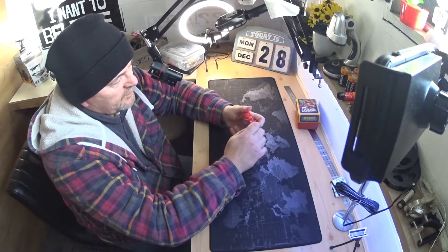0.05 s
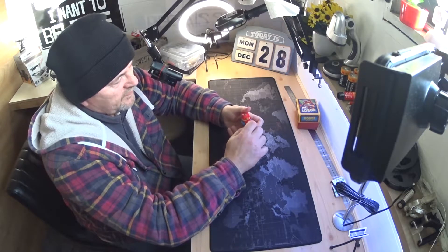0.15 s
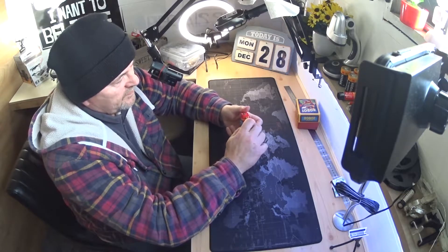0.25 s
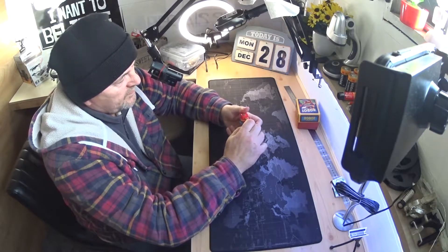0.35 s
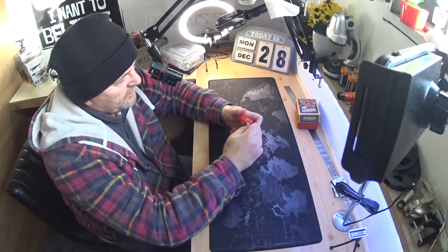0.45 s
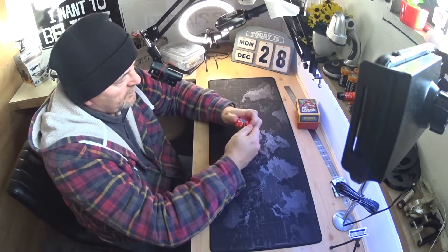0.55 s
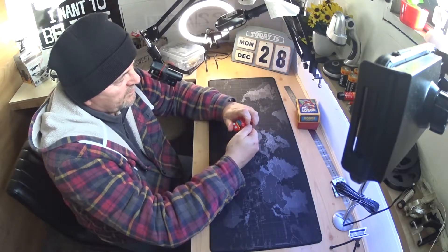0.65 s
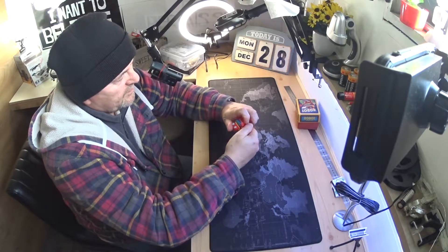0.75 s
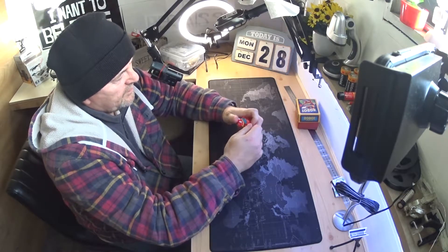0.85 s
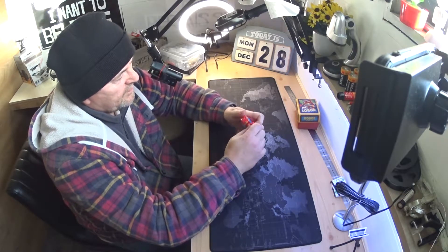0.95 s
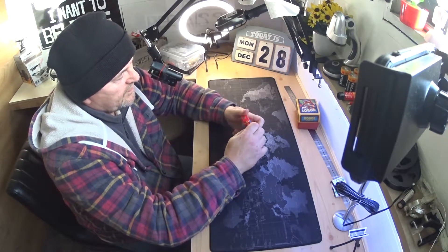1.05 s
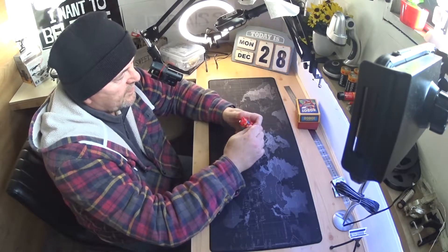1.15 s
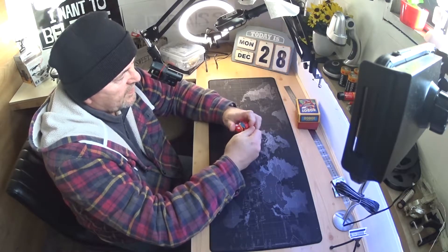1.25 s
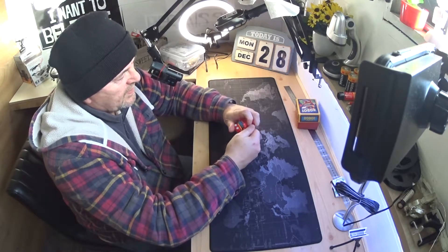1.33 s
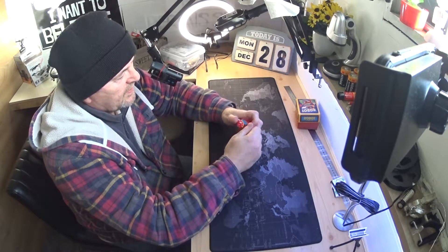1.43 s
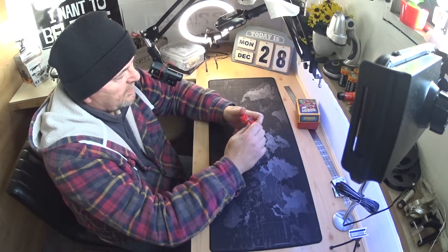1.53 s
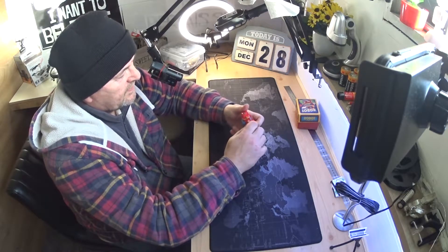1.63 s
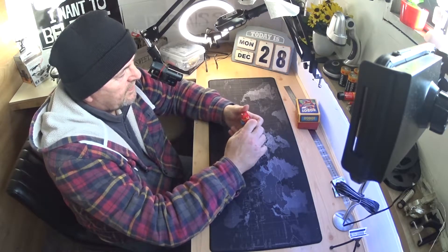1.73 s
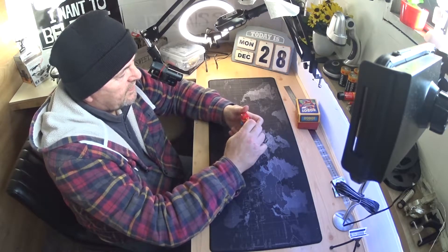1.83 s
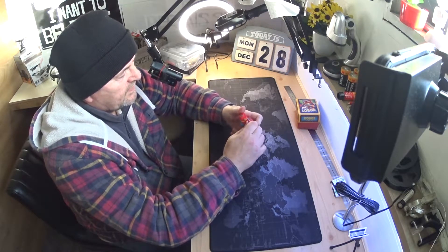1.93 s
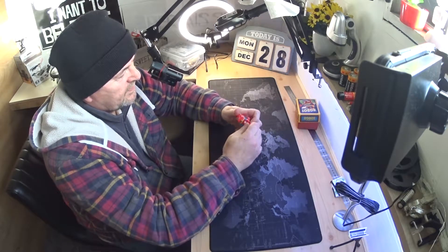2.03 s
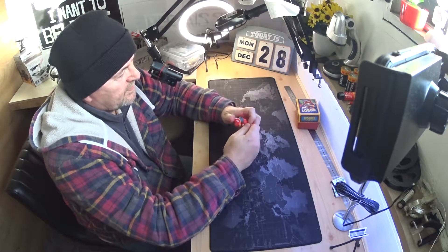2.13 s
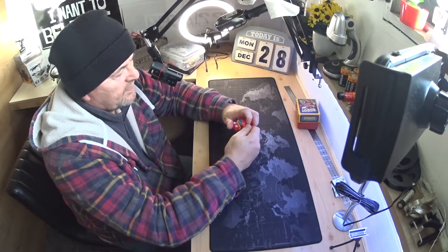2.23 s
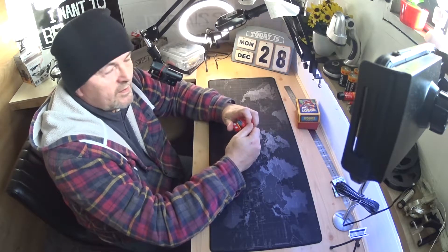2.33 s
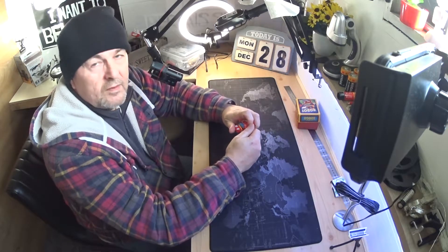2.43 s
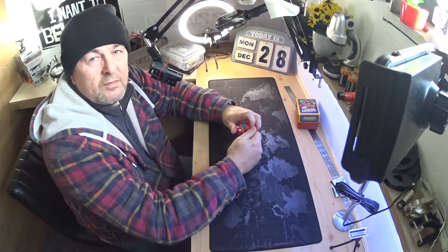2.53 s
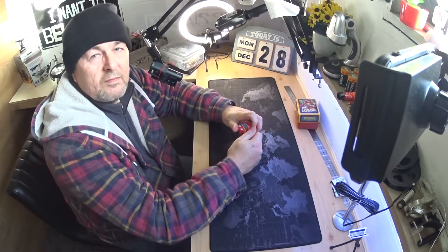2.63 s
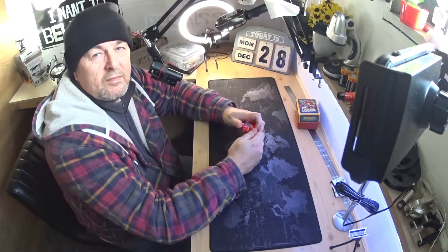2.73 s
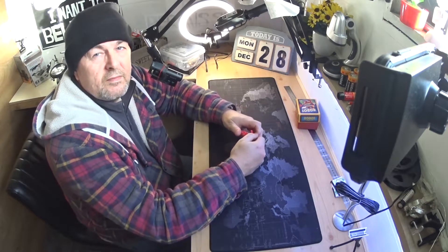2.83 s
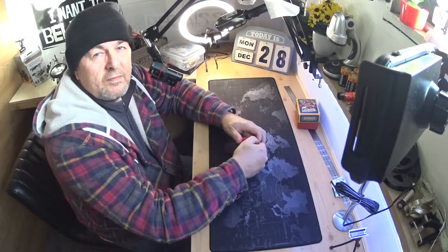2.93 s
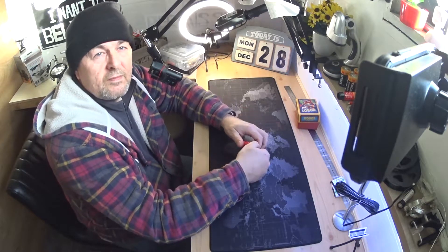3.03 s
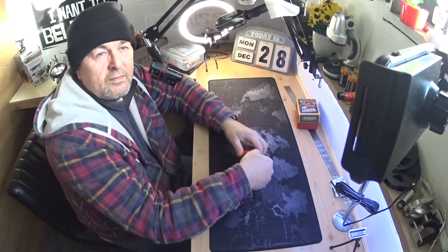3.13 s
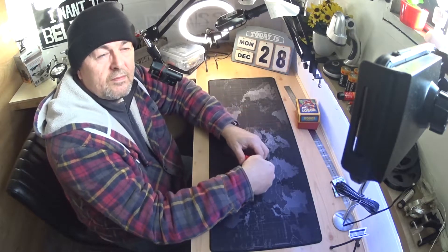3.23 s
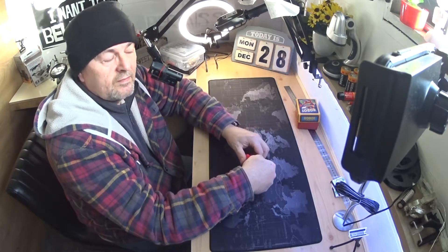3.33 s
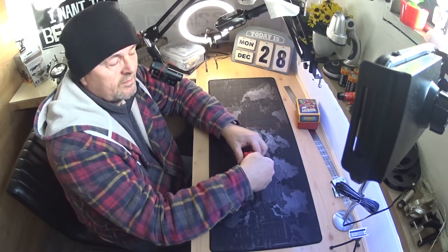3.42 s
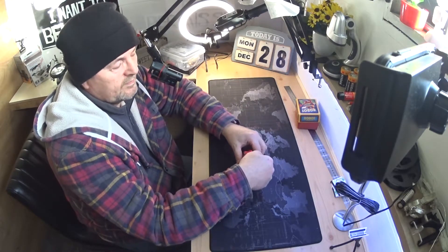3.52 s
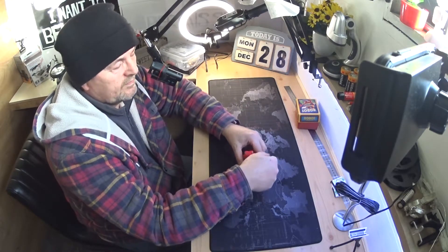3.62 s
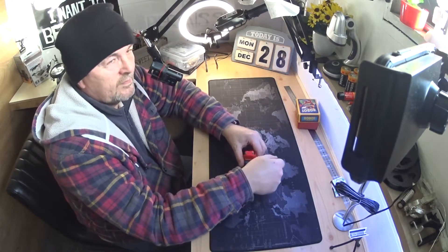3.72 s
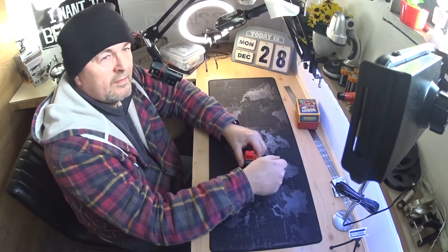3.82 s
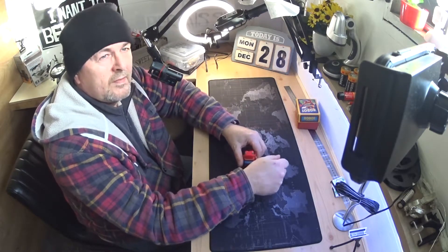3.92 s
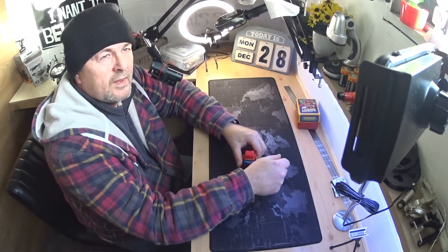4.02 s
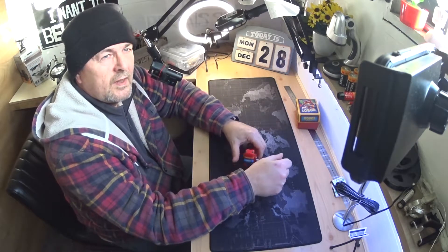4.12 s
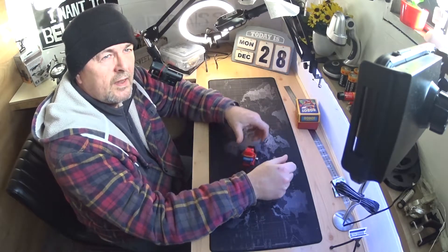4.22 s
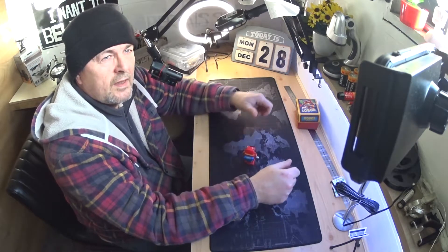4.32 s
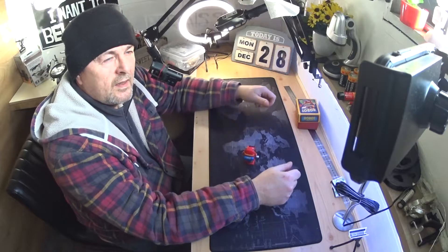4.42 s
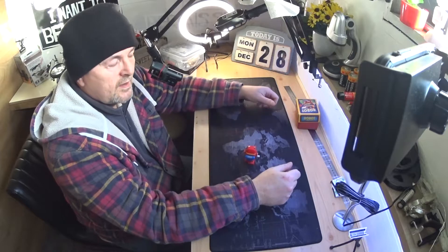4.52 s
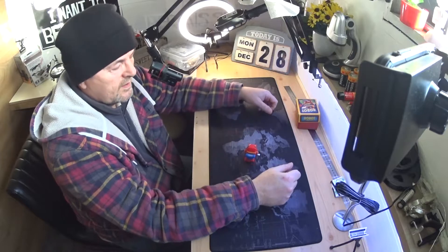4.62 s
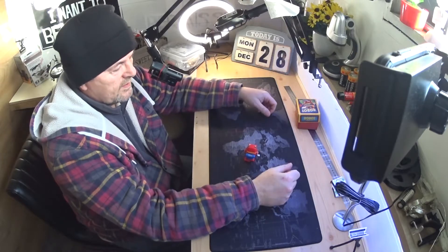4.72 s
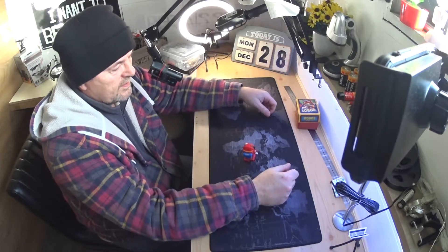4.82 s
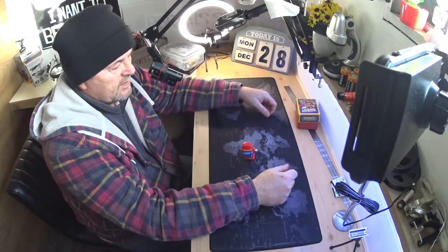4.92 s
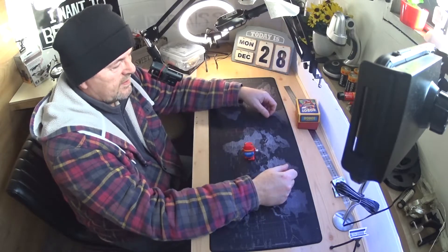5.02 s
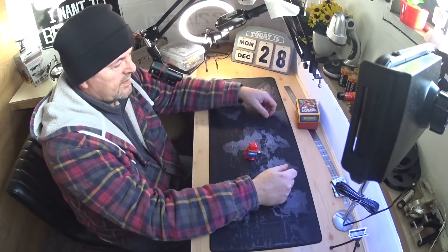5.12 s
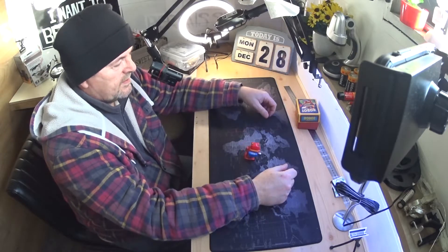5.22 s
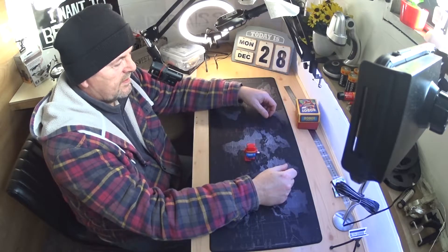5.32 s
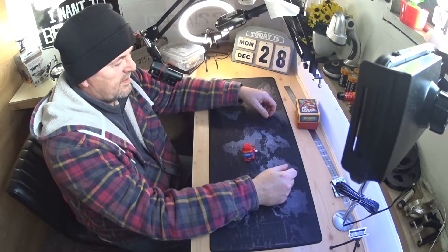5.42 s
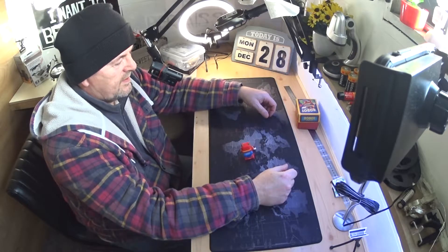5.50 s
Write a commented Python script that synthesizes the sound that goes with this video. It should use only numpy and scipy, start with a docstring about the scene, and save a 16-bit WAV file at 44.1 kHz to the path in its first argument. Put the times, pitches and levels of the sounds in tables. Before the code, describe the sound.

A tiny clockwork toy handled close to a stereo microphone: three short, rapid ratchet windings separated by near-silence and soft skin rubs, the last ending in a sharper ringing click. Then small plastic ticks, short gear slips and dull thuds on the desk. Finally the spring runs free with a continuous, hissy, high gear whirr, with intermittent low buzzes and soft bumps beneath it. Short room reflections, low noise floor, no talking.

```python
"""A faint tick and a soft knock, then a small plastic clockwork toy is wound in three short turns of its key.
Ratchet and loose-part clicks are rough bursts ringing the shell; finger rubs are dense small slips.
Gears slip in the hand, then whirr brightly as the released spring runs them: random tooth contacts, coloured.
Knocks ring the desk modes and the gears buzz through it; short, dense reflections fade quickly.
Two close ports hear it with level and phase differences, over a quiet noise floor."""
import sys
import numpy as np
from scipy import signal
from scipy.fft import rfft, irfft, next_fast_len
from scipy.io import wavfile

SR = 44100
rng = np.random.default_rng(int(sys.argv[2]) if len(sys.argv) > 2 else 0)


def persist_wave(psi):
    """Save psi, clipped to +-1, as 16-bit WAV."""
    counts = np.round(np.clip(psi, -1, 1) * 32767).astype(np.int16)
    wavfile.write(sys.argv[1], SR, np.atleast_2d(counts).T)


N = 245220
RUN_START_S, RUN_RISE_S = 3.958, 0.025


def from_db(db):
    """Decibels to gain."""
    return 10 ** (np.asarray(db) / 20)


def rms_one(x):
    """Scale to unit rms."""
    return x / np.sqrt(np.mean(x ** 2) + 1e-20)


def in_time(rows):
    """Columns of a curve over time, interpolated to every sample."""
    s, *columns = np.transpose(rows)
    return [np.interp(np.arange(N) / SR, s, c) for c in columns]


def at_hz(points, hz):
    """Read a table on a log-frequency axis."""
    p = np.array(points, float)
    return np.interp(np.log(hz + 1), np.log(p[:, 0] + 1), p[:, 1])


def coloured(x, spectrum):
    """Shape a steady signal by a spectrum; rms 1."""
    hz = np.arange(N // 2 + 1) * SR / N
    return rms_one(irfft(rfft(x) * from_db(at_hz(spectrum, hz)), N))


def drift(rate_hz):
    """Slow random wander, rms 1: low-passed noise made at every 40th sample."""
    pole = np.exp(-80 * np.pi * rate_hz / SR)
    noise = rng.standard_normal(N // 40 + 2002)
    slow = signal.lfilter([1], [1, -2 * pole, pole * pole], noise)[2000:]
    return np.interp(np.arange(N) / 40, np.arange(len(slow)), rms_one(slow))


def ring(x, hz, t60_s):
    """Decaying mode: a unit click sets a sine of height 1 ringing."""
    pole, w = from_db(-60 / (t60_s * SR)), 2 * np.pi * hz / SR
    return signal.lfilter([0, np.sin(w)], [1, -2 * pole * np.cos(w), pole * pole], x + 1e-18)


def resonance(x, hz, width_hz):
    """Two-pole band of gain 1 at its top."""
    pole = np.exp(-np.pi * width_hz / SR)
    feedback = [1, -2 * pole * np.cos(2 * np.pi * hz / SR), pole * pole]
    return signal.lfilter(np.array([1, 0, -1]) * (1 - pole * pole) / 2, feedback, x)


def boosted(x, hz, width_hz, boost_db):
    """Raise one resonance of a sound."""
    return x + (from_db(boost_db) - 1) * resonance(x, hz, width_hz)


def band(x, low_hz, high_hz):
    """Steep band-pass, rms 1."""
    return rms_one(signal.sosfilt(signal.butter(3, [low_hz, high_hz], "band", fs=SR, output="sos"), x))


def contacts(per_s, spread_db):
    """Random tiny impacts of uneven size and either sign."""
    sizes = from_db(spread_db * np.minimum(rng.exponential(1, N), 5)) * rng.choice([-1, 1], N)
    return sizes * (rng.random(N) < per_s / SR)


def swells(events, rise_db, fall_db_per_s):
    """Each event rises, holds and dies away; gain over time."""
    t, out = np.arange(N) / SR, np.zeros(N)
    for s, rise_s, hold_s, db in events:
        span = slice(int(s * SR), int(s * SR) + SR // 2)
        since = t[span] - s
        rise = rise_db * np.maximum(1 - since / rise_s, 0)
        fall = fall_db_per_s * np.maximum(since - rise_s - hold_s, 0)
        out[span] += from_db(db - rise - fall)
    return out


def lone_rings(events, rise_s):
    """Single decaying modes, set going softly."""
    out, t = np.zeros(N), np.arange(N) / SR
    for s, hz, db, t60_s in events:
        since = np.maximum(t - s, 0)
        envelope = from_db(db - 60 * since / t60_s) * (1 - np.exp(-since / rise_s))
        out += envelope * np.sin(2 * np.pi * hz * since)
    return out


# Noise floor spectrum. Each row: frequency in Hz, relative density in dB per Hz.
FLOOR_SPECTRUM = [(12, -56.5), (20, -9), (133, -8), (209, -14.5), (499, -16), (616, -16.5), (760, -21),
                  (1040, -17), (5210, -25), (5640, -21), (6430, -22), (10900, -23), (14200, -61.5),
                  (22000, -120)]


def quiet_floor():
    """Steady coloured noise, independent in mid and side."""
    mid, side = (coloured(rng.standard_normal(N), FLOOR_SPECTRUM) for _ in range(2))
    return from_db(-80.5) * (mid + 1.1 * side * [[1], [-1]])


def room(x, t60_s=0.12, fade_s=0.11, width=0.37):
    """Dense reflections: ten random patterns crossfade, one every 12 ms, for an even tail that fades quickly."""
    t, out = np.arange(SR // 6) / SR, 0
    shape = from_db(-60 * t / t60_s - 10 * (t / fade_s) ** 4) * (t > .002)
    patterns = rng.standard_normal((10, 2, len(t))) * shape / np.sqrt(np.sum(shape ** 2))
    place = np.arange(N) / 512 % 10
    for k, (mid, side) in enumerate(patterns):
        away = np.abs((place - k + 5) % 10 - 5)
        share = np.cos(np.pi / 2 * np.minimum(away, 1))
        echo = mid + width * side * [[1], [-1]]
        out = out + signal.oaconvolve(x[None] * share, echo, axes=1)[:, :N]
    return out


# Phase between the ports. Each row: frequency in Hz, lead of the left in radians.
LEFT_LEAD = [(0, 0), (150, .6), (430, 1.7), (690, 3.3), (950, 3.6), (1290, 2.6), (1720, .4), (2410, -.6),
             (12000, -.4)]
# Level between the ports. Each row: frequency in Hz, left minus right in dB.
LEFT_MINUS_RIGHT_DB = [(60, -6), (140, -4.5), (350, -3), (840, -11), (2030, -1.5), (4890, -0.5),
                       (11800, -2)]


def ports(x):
    """The two ports differ in level and phase by frequency, half the difference on each."""
    size = next_fast_len(N + 4096)
    hz = np.arange(size // 2 + 1) * SR / size
    half = from_db(at_hz(LEFT_MINUS_RIGHT_DB, hz) / 2) * np.exp(.5j * at_hz(LEFT_LEAD, hz))
    return irfft(rfft(x, size) * [half, 1 / half], size)[:, :N]


# Slow pushes on the desk. Each row: start in seconds, frequency in Hz, level in dB, t60 in seconds.
DESK_PUSHES = [(.66, 40, -54.5, .25), (2.94, 25, -45, .2), (3.21, 35, -53, .15), (3.345, 75, -42, .25),
               (3.47, 70, -57, .2), (5.38, 45, -58, .12)]


def desk_sway():
    """Slow pushes set deep single modes going."""
    return lone_rings(DESK_PUSHES, rise_s=.03)


# Each row: start in seconds, relative level in dB, modes above 200 Hz relative in dB, factor on t60 (least 0.2).
DESK_KNOCKS = [(0.0, -51.5, -2, 0.35), (0.871, -41, 10.5, 0.51), (0.886, -55, 19, 0.54),
               (1.359, -89, 21.5, 1.0), (2.333, -50.5, -34, 1.0), (2.503, -52.5, -4, 0.75),
               (2.869, -64.5, -28, 1.0), (3.15, -57.5, -9.5, 0.78), (3.206, -30, -9.5, 0.61),
               (3.228, -42, 3.5, 0.95), (3.345, -38.5, 7, 0.76), (3.465, -45.5, -5.5, 1.0),
               (3.676, -71.5, 10, 0.71), (3.898, -66, 7.5, 1), (3.954, -60.5, 10, 1.0),
               (4.168, -42.5, -41, 1.0), (4.313, -48, -21, 1.0), (4.573, -46, -34, 1.0),
               (4.732, -63.5, 18, 0.66), (5.376, -40, -11.5, 1.0)]
# Each row: mode frequency in Hz, relative level in dB, undamped t60 in seconds.
DESK_MODES = [(84, -14.5, 0.49), (132.7, 1, 0.54), (152.2, 4.5, 0.33), (200, 2, 0.26), (252.4, 6.5, 0.094),
              (317, 3.5, 0.13), (394, -6, 0.26), (546, -0.5, 0.11), (691.5, -13, 0.22), (890, -19, 0.032),
              (1210, -25, 0.2)]


def desk_knocks():
    """Soft knocks ring the desk's modes; a resting hand shortens them."""
    out, t = np.zeros(N), np.arange(SR // 3) / SR
    phases = rng.uniform(0, 2 * np.pi, (len(DESK_KNOCKS), len(DESK_MODES)))
    for (s, knock_db, upper_db, damping), knock_phases in zip(DESK_KNOCKS, phases):
        i = int(s * SR)
        for (hz, mode_db, t60_s), phase in zip(DESK_MODES, knock_phases):
            # each knock falls away fast after about 0.1 s
            fall_db = -60 * t / (t60_s * max(damping, .2)) - 10 * (t / 0.11) ** 6
            level = from_db(knock_db - 8.5 + mode_db + upper_db * (hz > 200) + fall_db)
            soft_rise = 1 - np.exp(-(t * hz / 1.05) ** 2)   # over a cycle or two
            wave = level * soft_rise * np.sin(2 * np.pi * hz * t + phase)
            out[i:i + len(t)] += wave[:N - i]
    return out


# The toy bears on the desk. Each row: start in seconds, rise in seconds, hold in seconds, level in dB.
DESK_BUZZES = [(3.06, 0.065, 0.037, -62), (3.2, .03, 0.03, -54), (3.335, 0.008, 0.13, -47.5),
               (3.89, 0.027, 0.0076, -55.5), (3.96, 0.034, 0.05, -51), (4.09, 0.014, 0.052, -56.5),
               (4.21, 0.021, 0.17, -50), (4.38, 0.054, 0.13, -50.5), (4.74, 0.084, 0.023, -46),
               (4.9, 0.026, 0.092, -72), (5.05, 0.036, 0.082, -53), (5.17, 0.024, 0.15, -70),
               (5.36, 0.036, 0.043, -50), (5.47, 0.035, 0.048, -62)]


def desk_buzz():
    """Noise shaking rings three modes, twice each; held in the hand, the upper one is stronger."""
    held = np.arange(N) < RUN_START_S * SR
    shaking = rng.standard_normal(N)
    buzz = np.zeros(N)
    for hz, db in ((407.4, 7.0), (506.7, -4.5 + 12 * held), (340.0, -17.5)):
        buzz += from_db(db) * ring(ring(shaking, hz, t60_s=0.066), hz, t60_s=0.047)
    return swells(DESK_BUZZES, rise_db=17, fall_db_per_s=445) * rms_one(buzz)


# Skin on shell and key. Each row: start in seconds, rise in seconds, hold in seconds, relative level in dB.
FINGER_RUBS = [(.39, 0.15, 0.019, -53.5), (.62, 0.061, 0.014, -53.5), (.8, 0.045, 0.0078, -61.5),
               (.96, .01, .01, -73), (1.13, 0.042, 0.2, -58.5), (1.94, 0.041, 0.13, -61.5),
               (2.15, 0.065, 0.031, -50), (2.33, 0.013, 0.019, -58.5), (2.41, 0.023, 0.012, -73)]
# Each row: frequency in Hz, relative density in dB per Hz.
RUB_SPECTRUM = [(500, -41), (900, -33.5), (1300, -15.5), (2200, -5), (3500, -3.5), (5000, -5),
                (11000, -13.5)]


def fingers():
    """Skin slides in dense small slips."""
    level = swells(FINGER_RUBS, rise_db=10, fall_db_per_s=222)
    flutter = from_db(6.5 + 5.9 * drift(27))
    return level * flutter * coloured(contacts(4400, spread_db=2.0), RUB_SPECTRUM)


# Faint lasting ring, likely the spring. Each row: start in seconds, frequency in Hz, level in dB, t60 in seconds.
SPRING_MODES = [(1.347, 1384, -60, 1.0), (1.347, 1310, -64, .7), (1.347, 1200, -68, .6)]


def spring_ping():
    """Three close modes ring on and waver."""
    return lone_rings(SPRING_MODES, rise_s=.008) * (1 + .5 * drift(40))


# Parts that ring out clearly. Each row: start in seconds, frequency in Hz, level in dB, t60 in seconds.
NUDGED_PARTS = [(.002, 2105, -49, 0.034), (.005, 450, -63, 0.33), (.24, 3470, -56.5, .04),
                (.243, 3250, -63, 0.027), (1.348, 1345, -36.5, 0.11), (1.352, 963, -56.5, .1),
                (3.346, 1180, -39, 0.072), (3.346, 517, -49, 0.096), (3.43, 516, -43, 0.18),
                (1.35, 1207, -39, 0.13), (1.35, 764, -55, 0.11), (1.352, 610, -53.5, 0.2),
                (1.385, 527, -56, 0.2), (1.375, 362, -60, 0.17), (2.333, 2010, -39.5, 0.14),
                (2.334, 2427, -36, 0.1), (2.334, 3300, -36, .08), (3.662, 3560, -45, 0.058),
                (3.664, 3330, -52, .035), (3.662, 1730, -56, .04), (3.664, 1410, -53, 0.071),
                (3.684, 3420, -45.5, 0.042)]


def part_rings():
    """Single parts ring when nudged."""
    return lone_rings(NUDGED_PARTS, rise_s=0.00036)


# Ranges low, middle, high. Each row: low edge in Hz, high edge in Hz, resonances (Hz, width in Hz, boost in dB).
SHELL_RANGES = [(1102, 4600, [(1300, 660, 11.5), (2110, 110, 7)]), (3030, 5770, [(3300, 550, 3.5),
                (4924, 900, 14)]), (5780, 10750, [(6780, 1030, 4.5), (7500, 1300, 1), (10920, 580, 7.5)])]


def shell_clicks(events, level_db, burst_ms):
    """Each click is a very short rough burst of contacts that sounds through the three ranges of the shell."""
    length = 400
    t, out = np.arange(length) / SR * 1000 / burst_ms, np.zeros(N)
    s, click_db, middle_db, low_db = np.transpose(events)
    places = (s * SR).astype(int)[:, None] + np.arange(length)
    rough = rng.standard_normal((len(s), 3, length)) * t * np.exp(-t)
    for k, ((low_hz, high_hz, rings), range_db) in enumerate(zip(SHELL_RANGES, (low_db, middle_db, 0))):
        sos = signal.butter(4, [low_hz, high_hz], "band", fs=SR, output="sos")
        bursts = signal.sosfilt(sos, rough[:, k])
        bursts = bursts / np.sqrt(np.sum(bursts ** 2, axis=1, keepdims=True))   # equal energy
        part = np.zeros(N)
        np.add.at(part, places, from_db(click_db + range_db + level_db)[:, None] * bursts)
        for hz, width_hz, boost_db in rings:
            part = boosted(part, hz, width_hz, boost_db)
        out += part
    return out


# Each row: start in seconds, relative level in dB, middle shell range relative in dB, low range relative in dB.
LOOSE_TICKS = [(0.0004, -38.5, -8.5, -6.5), (0.1111, -52.5, -14, -15), (0.2327, -42, -21, -20),
               (0.8834, -34, -11, -39), (0.905, -37, -7.5, -33), (0.968, -30, -22, -33),
               (0.9752, -23, -19, -30.5), (1.485, -41.5, -32, -18), (1.5234, -34.5, -49, -38),
               (1.5773, -37, -18, -22), (1.7714, -53, -11.5, -17), (1.7948, -44.5, -23, -18),
               (1.8402, -51, -27, -22), (2.4243, -35, -15, -31), (2.513, -60, -10, -20),
               (2.6858, -62, -13.5, -16), (2.7551, -60.5, 0, -11), (2.8145, -23, -18, -35),
               (2.8622, -39.5, 6.5, -10), (2.9444, -45, 0, -29), (2.9644, -55, -1, -25),
               (3.0046, -47, -11, -27), (3.2084, -17.5, -13, -13), (3.3462, -19.5, -7, -6),
               (3.6721, -52, -25, -2)]


def loose_ticks():
    """Loose parts tick as the fingers shift their grip."""
    return shell_clicks(LOOSE_TICKS, level_db=6.57, burst_ms=2.9)


# Each row: start in seconds, relative level in dB, middle shell range relative in dB, low range relative in dB.
PAWL_DROPS = [(0.3873, -18.5, -23.5, -36), (0.401, -19.5, -10, -37), (0.4094, -15, -14, -19.5),
              (0.4193, -17, -18.5, -25.5), (0.4248, -17, -14, -33.5), (0.4351, -13, -20.5, -35),
              (0.4586, -25.5, -14, -41), (0.479, -20.5, -13.5, -43), (0.4942, -14.5, -21.5, -37.5),
              (0.505, -15, -14, -30), (0.5117, -14, -10.5, -25.5), (0.523, -17.5, -13, -22),
              (0.5294, -14.5, -12.5, -20), (0.538, -21, -11, -19), (0.5474, -18.5, -17.5, -31),
              (0.5604, -22.5, -13.5, -28.5), (0.5795, -17.5, -17, -35), (0.598, -20, -13, -40),
              (0.615, -18, -11, -49), (0.632, -21.5, -13, -38.5), (0.648, -16, -14, -40),
              (0.6603, -25, -22, -36), (0.6774, -16, -12, -47), (0.6963, -19, -8, -49),
              (0.7238, -21.5, -9, -47), (0.7949, -14, -11, -24), (1.1324, -27, -12, -43),
              (1.1451, -18.5, -11, -37), (1.1558, -18.5, -14.5, -27), (1.1671, -17, -9, -26),
              (1.1781, -16, -14, -21), (1.1905, -19, -20.5, -22.5), (1.2052, -16.5, -18, -36.5),
              (1.219, -17, -29, -42), (1.2318, -17, -24.5, -47), (1.2423, -19, -21, -38),
              (1.254, -19.5, -14.5, -32.5), (1.2661, -14, -15.5, -24), (1.2786, -18.5, -11, -22.5),
              (1.2892, -18, -10.5, -23), (1.306, -15.5, -11.5, -19), (1.3273, -18.5, -11, -22),
              (1.3454, -17, -13, -26.5), (1.378, -20.5, -9.5, -23.5), (1.9445, -27, -15, -57),
              (1.9612, -16.5, -18, -50.5), (1.9723, -17, -12, -50), (1.9886, -20, -10, -27.5),
              (2.0232, -19, -14, -30), (2.0634, -13.5, -11.5, -34.5), (2.0843, -15, -22.5, -31),
              (2.096, -15.5, -8.5, -31), (2.1097, -14, -17, -31), (2.1253, -23.5, -16.5, -28),
              (2.1591, -17, -15, -28), (2.1878, -18.5, -12.5, -24), (2.2113, -18.5, -8.5, -24.5),
              (2.2198, -24, -13, -21.5), (2.243, -25.5, -13, -28), (2.2829, -19.5, -10, -28),
              (2.3317, -10.5, -15.5, -11.5)]


def ratchet():
    """The pawl drops over the ratchet teeth."""
    return shell_clicks(PAWL_DROPS, level_db=8.2, burst_ms=.75)


# Brief slips in the hand. Each row: start in seconds, rise in seconds, hold in seconds,
# relative whirr level in dB, low chatter relative to it in dB, hollow body relative to it in dB.
GEAR_SLIPS = [(2.773, 0.017, 0.045, -37.5, -22, -69.5), (2.928, 0.0068, 0.027, -55, -23, -38),
              (3.035, 0.038, 0.0031, -33, -25.5, -27.5), (3.08, 0.029, 0.061, -61.5, -2, 1.5),
              (3.199, 0.027, 0.022, -24.5, -18, -25.5), (3.274, 0.009, 0.01, -36.5, -19, -39),
              (3.339, 0.0058, 0.075, -30, -17, -22), (3.388, 0.053, 0.029, -27.5, -22, -48),
              (3.887, .028, 0.0025, -38.5, -28.5, -40)]
# The spring's run. Each row: time in seconds, relative whirr level in dB, centre of its brightest part in Hz,
# ring of the frame relative to it in dB, low chatter relative to it in dB.
SPRING_RUN = [(3.99, -27, 8050, -20, -25), (4.016, -30, 8270, -17, -17.5), (4.05, -29, 7930, -24, -24),
              (4.172, -28.5, 8100, -6, -15), (4.264, -29.5, 8030, -15.5, -20.5),
              (4.418, -27, 8680, -13, -15.5), (4.462, -27, 8020, -12.5, -22.5),
              (4.492, -27.5, 7950, -24.5, -19.5), (4.596, -29, 8470, -15, -19.5),
              (4.684, -27.5, 8150, -22, -17.5), (4.93, -27.5, 8330, -22, -23), (5.0, -28, 8830, -13, -16),
              (5.152, -30, 8260, -19.5, -25.5), (5.188, -28.5, 8800, -34, -22),
              (5.226, -27, 7690, -13.5, -22), (5.366, -28, 8220, -12, -11), (5.432, -29, 8200, -18.5, -25),
              (5.56, -30, 7640, -13.5, -12)]


def gear_levels():
    """Gains of whirr, frame ring, low chatter and hollow body; the lows of a slip die more slowly."""
    s, rise_s, hold_s, db, chatter_db, body_db = np.transpose(GEAR_SLIPS)
    rise_db = 27
    slip = swells(zip(s, rise_s, hold_s, db), rise_db, fall_db_per_s=548.5)
    slip_chatter = swells(zip(s, rise_s, hold_s, db + chatter_db), rise_db, fall_db_per_s=293)
    slip_body = swells(zip(s, rise_s, hold_s, db + body_db), rise_db, fall_db_per_s=293)
    run_db, _, run_frame_db, run_chatter_db = in_time(SPRING_RUN)
    since = np.arange(N) / SR - RUN_START_S
    run = (since > 0) * from_db(run_db - rise_db * np.clip(1 - since / RUN_RISE_S, 0, 1))
    run_body_db = -26 - 23 * since + 4.0 * drift(8)   # fades by 23 dB per s
    return (slip + run,
            slip * from_db(-29.5) + run * from_db(run_frame_db),
            slip_chatter + run * from_db(run_chatter_db),
            slip_body + run * from_db(run_body_db))


# Tooth-contact spectrum. Each row: frequency in Hz, relative density in dB per Hz.
WHIRR_SPECTRUM = [(410, -63.5), (700, -34.5), (822, -45.5), (1130, -29), (1230, -16), (1880, -18.5),
                  (2230, -14), (2910, -14), (3460, -7.5), (4610, -11.5), (6730, -4), (7900, -3),
                  (10900, -0.5), (14200, -37.5), (22000, -120)]
# Each row: frequency in Hz, width in Hz, mean boost in dB.
GEAR_RESONANCES = [(2300, 81, -5), (6200, 49, 6.5)]
CONTACTS_PER_S = 2500   # steady for the frame; the tooth rate wanders about it


def tooth_contacts():
    """Dense contacts of wandering rate, with two resonances of wandering strength."""
    teeth = coloured(contacts(CONTACTS_PER_S * from_db(2.7 * drift(60)), spread_db=0.0), WHIRR_SPECTRUM)
    for hz, width_hz, boost_db in GEAR_RESONANCES:
        teeth = boosted(teeth, hz, width_hz, boost_db + 1.4 * drift(8.2))
    return teeth


def bright_whirr(teeth):
    """The highs of the contacts, with a broad hump that follows its centre; the colour wanders slowly at random."""
    bright_hz = in_time(SPRING_RUN)[1]
    whirr = signal.sosfilt(signal.butter(4, 2800, "high", fs=SR, output="sos"), teeth)
    for hz in range(6500, 10500, 500):
        near = np.exp(-((hz - bright_hz) / 500) ** 2)
        whirr = boosted(whirr, hz, 810, 3.7 * near + 0.67 * drift(5.9))
    return rms_one(whirr) * from_db(1.0 * drift(25))


def gears():
    """Tooth contacts sound as whirr, low chatter and hollow body and ring the frame; fuller in the middle if held."""
    level, frame, chatter, body = gear_levels()
    teeth = tooth_contacts()
    frame_ring = rms_one(resonance(contacts(CONTACTS_PER_S, spread_db=2.0), hz=3560, width_hz=120))
    held = np.arange(N) < RUN_START_S * SR
    air = level * bright_whirr(teeth)
    air += chatter * band(teeth, 1355, 2500)
    air += frame * from_db(1.0) * frame_ring
    air += body * from_db(3.5) * band(teeth, 774, 1130)
    air += held * level * from_db(-7.5) * band(teeth, 4100, 5680)
    return from_db(-2.0) * air


def scene():
    """Toy with its reflections, desk and the quiet floor."""
    whirr = gears()
    toy = ratchet() + loose_ticks() + fingers() + part_rings()
    reflections = from_db(-2.3) * room(toy + from_db(1.5) * whirr)
    heard = toy + whirr + reflections + desk_knocks() + desk_buzz() + spring_ping()
    return ports(heard) + desk_sway() + quiet_floor()


def record(dry):
    """The top is cut steeply above 11030 Hz."""
    return signal.sosfilt(signal.ellip(12, .5, 55, 11030, fs=SR, output="sos"), dry)


dry = scene()
out = record(dry)
persist_wave(out)
```